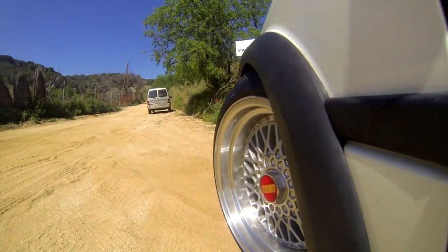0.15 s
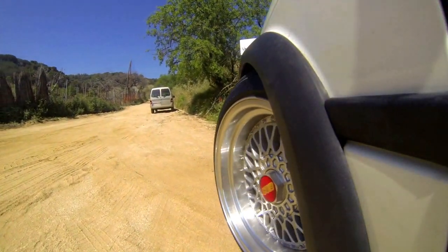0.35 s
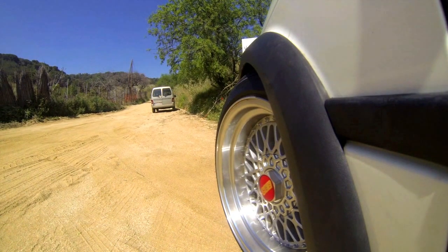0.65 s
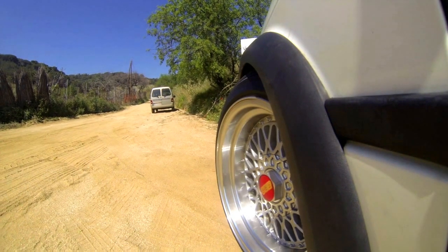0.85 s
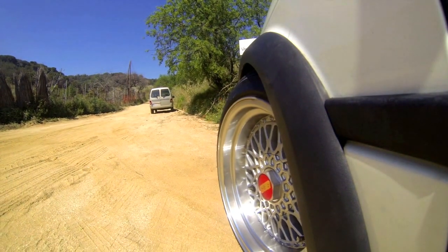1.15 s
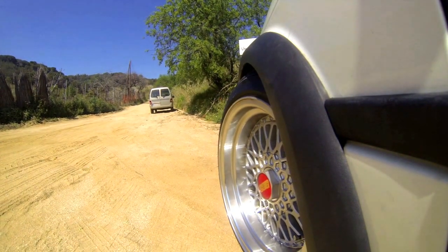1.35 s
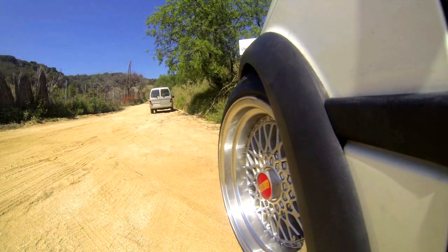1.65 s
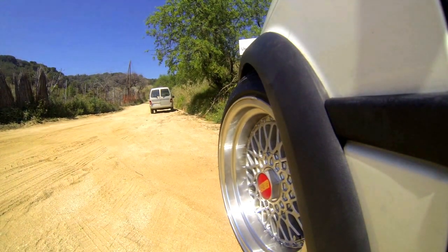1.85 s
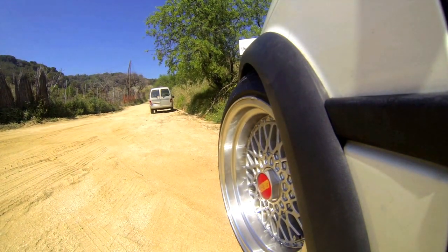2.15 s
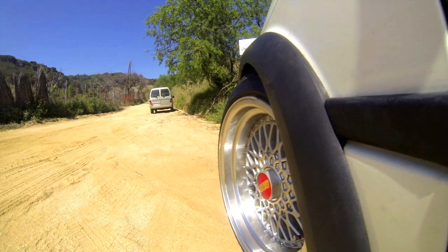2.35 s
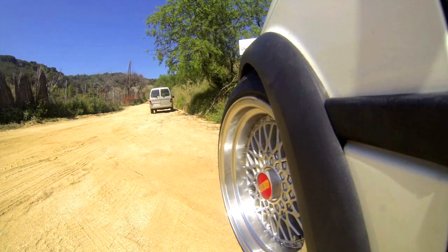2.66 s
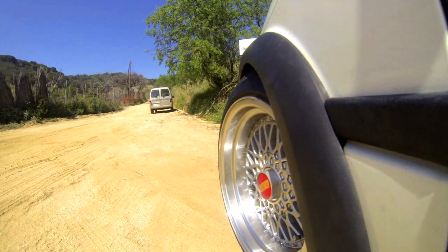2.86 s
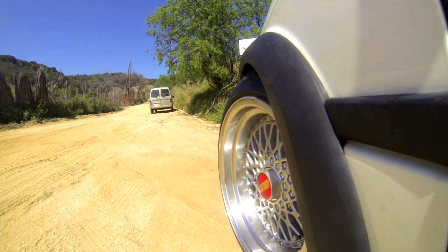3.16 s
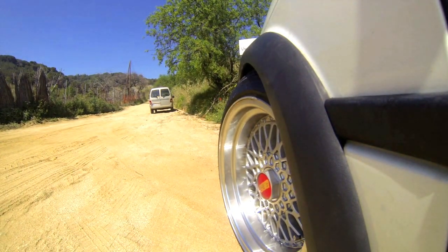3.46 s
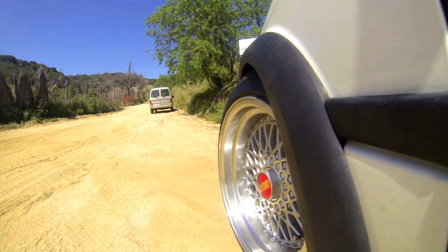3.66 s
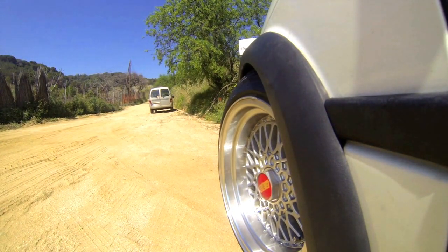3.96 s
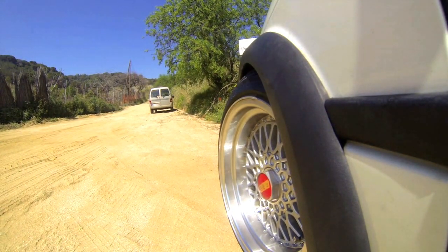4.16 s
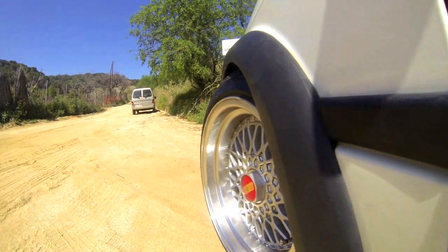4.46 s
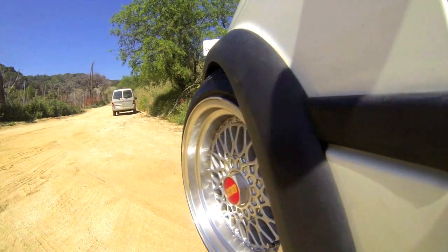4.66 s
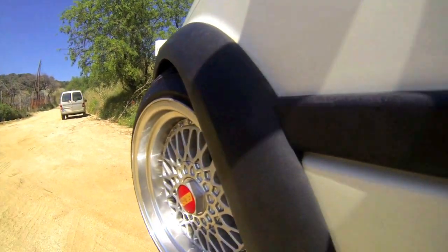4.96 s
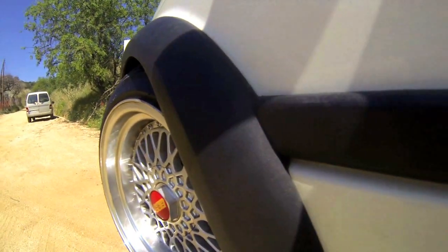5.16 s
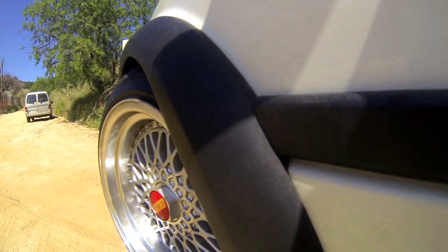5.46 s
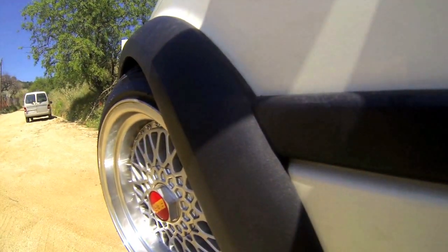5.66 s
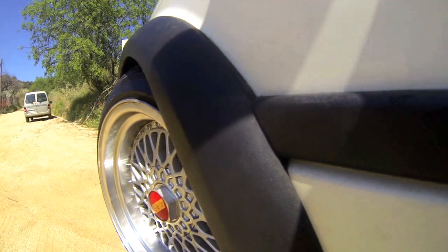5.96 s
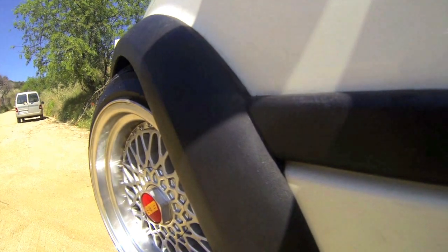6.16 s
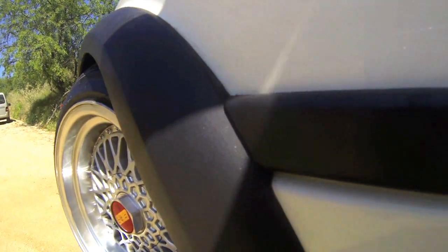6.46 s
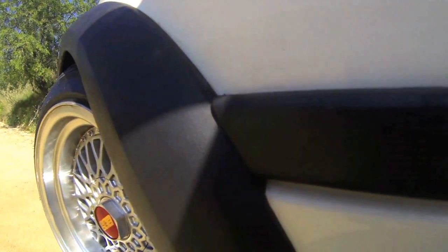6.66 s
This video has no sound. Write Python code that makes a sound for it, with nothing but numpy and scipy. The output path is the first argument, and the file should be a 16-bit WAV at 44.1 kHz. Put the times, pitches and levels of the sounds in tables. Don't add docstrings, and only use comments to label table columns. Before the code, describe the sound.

A car engine hums low and throbbing as it creeps over dirt, heard from inside a closed case on its flank. Grit hisses softly, ruts thump the door panel, and a hard bonk with rattle comes mid-way. A dense burst of knocks, plastic ticks and a tiny metallic ring follows, then smaller bumps fade into calm rolling.

```python
import sys
import numpy as np
from scipy import signal
from scipy.io import wavfile
from scipy.ndimage import uniform_filter1d

SR = 44100
rng = np.random.default_rng(int(sys.argv[2]) if len(sys.argv) > 2 else 0)


def boost(x):
    u = np.asarray(x, float) / 20
    return 10 ** u


def to_wav(s):
    ch = np.atleast_2d(s).T
    pcm = np.round(np.clip(ch, -1, 1) * 32767)
    wavfile.write(sys.argv[1], SR, pcm.astype(np.int16))


N = 300850
TIME = np.arange(N) / SR

# time in seconds, loose grit in dB, roughness in dB.
GROUND = [(0, -74.5, -63), (.35, -76.5, -52), (.76, -75.5, -59), (1.01, -69.5, -52.5), (1.18, -61, -56),
          (1.46, -57, -50.5), (2.41, -70, -54), (2.7, -71, -55.5), (3.45, -73.5, -55.5), (3.71, -71, -40),
          (4.05, -78, -48), (4.27, -70, -49.5), (4.4, -55.5, -44), (4.54, -71.5, -41.5), (4.74, -69, -48),
          (5.41, -76, -54.5), (6.3, -73.5, -62), (6.7, -76, -61)]


def evened(x):
    return x / np.sqrt(np.mean(x ** 2) + 1e-20)


def curves(rows):
    s, *columns = np.transpose(rows)
    return [np.interp(TIME, s, column) for column in columns]


def add(mix, s, sound):
    part = mix[round(s * SR):][:len(sound)]
    part += sound[:len(part)]


def wander(per_s):
    hz, phase = np.geomspace(per_s / 10, per_s, num=16), rng.random(16)
    coarse = TIME[::256]
    sines = np.sin(2 * np.pi * (hz * coarse[:, None] + phase))
    return evened(np.interp(TIME, coarse, sines @ hz ** -.5))


def ring(x, modes):
    out = np.zeros(len(x))
    for k, (hz, width, db) in enumerate(modes):
        pole = np.exp((2j * np.pi * hz - np.pi * abs(width)) / SR)
        answer = signal.lfilter([1], [1, -pole], x).imag
        out += (-1) ** k * boost(db) * np.sqrt(1 - abs(pole)) * answer
    return out


def noise(spectrum, patchy_db, size):
    hz = np.fft.rfftfreq(size, 1 / SR)
    a, b, patches = rng.standard_normal((4 * N // size + 5, len(hz), 3)).T
    patches = uniform_filter1d(patches, size=8, axis=0)
    patches = evened(uniform_filter1d(patches, size=8, axis=1))
    f, db = np.transpose(spectrum)
    shape_db = np.interp(np.log(hz + 1), np.log(f + 1), db, left=-120, right=-120)
    z = (a + 1j * b) * boost(shape_db[:, None] + patchy_db * patches)
    return evened(signal.istft(z, nperseg=size, noverlap=3 * size // 4)[1][:N])


def engine():
    # time in seconds, firing rate in Hz, level of the firing order in dB.
    idle = [(0, 24.1, -43), (.15, 24.8, -43), (.3, 27.5, -54), (.45, 35.4, -36), (.75, 34.3, -41),
            (.9, 30.8, -42), (1.11, 28.1, -44), (1.52, 27.9, -43), (2.25, 27, -46), (2.46, 27.8, -46),
            (2.99, 27.8, -43), (3.55, 27.7, -48), (3.85, 28.4, -41), (4.25, 28.3, -40), (5.13, 26.5, -42),
            (5.55, 27.5, -41), (6.03, 27.8, -40.5), (6.3, 27.1, -44)]
    # time in seconds, change in dB, half length in seconds.
    rocks = [(0.086, -4, 0.028), (0.205, -0.5, 0.046), (0.605, -4, 0.059), (1.277, -11, .07),
             (1.434, -14.5, 0.096), (1.8, -6.5, 0.057), (2.135, -16, 0.07), (2.24, -22, 0.065),
             (3.12, -7.5, .12), (3.366, -16, 0.065), (3.7, -15, 0.07), (3.885, -12, .1), (4.328, 13, 0.079),
             (4.527, -17.5, 0.089), (4.714, -13, 0.058), (4.92, -2.5, 0.072), (5.16, -17, 0.11),
             (5.672, -4, 0.12), (6.493, -10, 0.15)]
    # order as a multiple, level in dB against order 3.
    uneven = [(2.5, -17), (3.5, -10.5), (4, -15.5)]
    average_rough_db, drift_db = -51, 2.3

    hz, first_db = curves(idle)
    for s, db, half in rocks:
        first_db = first_db + db * np.maximum(1 - abs(TIME - s) / half, 0)
    turn = 2 * np.pi * np.cumsum(hz) / SR
    rough_db = curves(GROUND)[1] - average_rough_db
    second_db = -55 + 0.46 * rough_db + drift_db * wander(per_s=2)
    second_db += -5.5 * np.clip(2 * (TIME - 5.5), 0, 1)
    third_db = -58 + 0.11 * rough_db + drift_db * wander(per_s=2)
    orders = [(1, first_db), (2, second_db), (3, third_db)]
    orders += [(round(2 * k) / 2, third_db + db) for k, db in uneven]
    return sum(np.sqrt(2) * boost(db) * np.sin(k * turn) for k, db in orders)


def road():
    # frequency in Hz, density in dB per Hz.
    cavity = [(410, -41.5), (700, -14.5), (920, -12), (1040, -13), (1180, 1), (1400, 2), (1600, -5),
              (1830, -32.5), (2150, -12.5), (2350, -32), (3050, -35), (3600, -32.5), (4500, -45),
              (7000, -64.5)]
    # pitch in Hz, width in Hz, level in dB.
    panel = [(99.3, 12, 1), (108, 12, -4), (212.8, 34, -14), (138.2, 13, -13)]
    # frequency in Hz, density in dB per Hz.
    structure = [(10, -26.5), (18, -3.5), (35, -14), (50, -16.5), (75, -10.5), (103, -16), (145, -29),
                 (180, -40), (244, -34), (302, -29.5), (402, -36), (600, -37.5), (1000, -48.5), (1300, -84)]

    cavity_db, panel_db = curves(GROUND)
    stirred = boost(-63.5) + boost(cavity_db - 7) + boost(panel_db - 18)
    clumps = evened(uniform_filter1d(rng.standard_normal(N), size=500))
    hiss = noise(cavity, patchy_db=1.5, size=512) * boost(0.26 * clumps)
    gusts = evened(uniform_filter1d(rng.standard_normal(N), size=1500))
    jolts = rng.standard_normal(N) * boost(4.24 * gusts)
    shake = evened(ring(jolts, panel))
    rumble = noise(structure, patchy_db=1.6, size=4096)
    return boost(cavity_db + 1.0) * hiss + boost(panel_db - 0.8) * shake + boost(3) * stirred * rumble


def camera():
    # phase of the cycle from 0 to 1, whine pitch in Hz, level in dB.
    readout = [(0, 14955, -83), (.17, 14955, -83), (.21, 14890, -93), (.25, 14945, -82), (.4, 14850, -80.5),
               (.47, 14845, -81), (.51, 14840, -104), (.91, 14930, -104), (.96, 14950, -84)]
    # frequency in Hz, density in dB per Hz.
    preamp = [(900, -20.5), (1800, 0.5), (2500, -4), (3200, -7), (5000, -11), (8000, -16.5), (12500, -20.5),
              (13800, -29.5), (15300, -36.5)]
    readout_per_s = 15 / 1.001

    phase, hz, db = np.transpose(readout)
    cycle = TIME * readout_per_s % 1
    wobble_hz = 65 * evened(uniform_filter1d(rng.standard_normal(N), size=600))
    turn = 2 * np.pi * np.cumsum(np.interp(cycle, phase, hz, period=1) + wobble_hz) / SR
    gate = boost(np.interp(cycle, phase, db, period=1))
    whine = gate * (np.sin(turn) + boost(-9.5) * np.sin(turn / 2))
    return whine + boost(-80.5) * noise(preamp, patchy_db=-1.35, size=512)


def panel_swings(events):
    out, t = np.zeros(N), np.arange(SR // 2) / SR
    rise_turns = 1.5
    for (s, db, hz, t60), phase in zip(events, rng.random((len(events), 2))):
        partner = np.sin(2 * np.pi * (1.17 * hz * t + phase[0]))
        swing = np.sin(2 * np.pi * hz * t) + 0.17 * partner
        envelope = (1 - np.exp(-t * hz / rise_turns)) * boost(-60 * t / max(t60, .03))
        add(out, s - .004, boost(db) * swing * envelope / envelope.max())
    return out


def thumps():
    # time in seconds, peak in dB, panel pitch in Hz, ring t60 in seconds.
    ruts = [(.03, -50, 87.6, 0.2), (.6, -49, 109, .48), (.908, -50, 91.7, 0.22), (1.035, -43.5, 88, 0.29),
            (1.278, -33.5, 95.5, 0.14), (1.54, -48, 125, 0.13), (1.682, -44.5, 117, 0.16),
            (1.822, -36, 99, 0.21), (1.85, -31, 102.3, .16), (1.952, -36.5, 92.7, 0.19),
            (2.175, -43.5, 104.6, 0.22), (2.29, -45.5, 108, 0.67), (2.5, -45, 101.4, 0.21),
            (3.06, -48, 96, 0.26), (3.188, -35, 89, 0.16), (3.256, -37.5, 95.1, 0.47),
            (3.554, -29.5, 140, .16), (3.573, -28.5, 94.9, 0.22), (3.601, -42, 81.2, 0.17),
            (3.736, -38, 93.7, .22), (4.047, -43, 85, 0.46), (4.278, -23.5, 84, 0.18),
            (4.287, -22, 108, 0.1), (4.378, -31.5, 90.6, 0.2), (4.659, -33.5, 108, 0.1),
            (4.699, -32.5, 96.4, 0.16), (4.972, -33, 100, 0.16), (5.068, -33.5, 96.7, 0.14)]
    return panel_swings(ruts)


def belt():
    # start in seconds, end in seconds, pitch in Hz, level in dB.
    lines = [
        (3.2, 3, 440, -79),
        (5.42, 6.82, 330, -76.5),
        (2.8, 4.2, 357, -85),
        (4.6, 6, 380, -84),
        (.35, .8, 420, -79.5),
        (1.55, 3.3, 415, -80),
        (5.6, 6.15, 370, -86),
    ]
    out = np.zeros(N)
    for start, end, hz, db in lines:
        on = uniform_filter1d(1. * (TIME > start) * (TIME < end), size=6000)
        turn = 2 * np.pi * np.cumsum(hz * (1 + 0.01017 * wander(per_s=2))) / SR
        out += on * boost(db + 1.5 * wander(per_s=5)) * np.sqrt(2) * np.sin(turn)
    return out


def bonks():
    # time in seconds, peak in dB, pitch in Hz, ring t60 in seconds.
    upper_mode = [(1.272, -48, 197, .15), (1.461, -56, 197, .15), (1.545, -53.5, 241, 0.2),
                  (1.677, -54, 234, 0.22), (1.83, -53.5, 227, 0.36), (2.184, -57, 241, 0.27),
                  (3.028, -57.5, 188, 0.14), (3.197, -55.5, 190.3, 0.26), (3.503, -49.5, 291, 0.094),
                  (3.556, -32, 198.3, 0.25), (3.573, -26.5, 223.5, 0.14), (3.879, -48.5, 215, 0.072),
                  (4.05, -51, 190, .29), (4.28, -34, 211.6, 0.059), (4.306, -39.5, 227.8, .28),
                  (4.37, -40.5, 232.3, 0.1), (4.64, -44.5, 212, 0.15), (5.033, -39.5, 210.9, 0.29),
                  (5.073, -36.5, 214.7, 0.18), (5.311, -50.5, 345, .1), (5.312, -41, 213.4, 0.12),
                  (5.342, -42.5, 215, .1), (6.483, -61, 220, 0.33)]
    return panel_swings(upper_mode)


def blows():
    # time in seconds, peak in dB, dull modes in dB,
    # rattle t60 in seconds, favoured pitch in Hz.
    on_mount = [(1.8218, -42.5, -6, 0.1, 1320), (3.5073, -43.5, -2, 0.068, 1400),
                (3.5536, -31.5, 2, 0.11, 1230), (3.5796, -50, 1, 0.25, 1290),
                (3.6192, -51.5, -2, 0.12, 1250), (4.3887, -39, -5, .059, 1220),
                (4.4244, -36.5, 1.5, 0.057, 1410), (4.4495, -37.5, -7.5, 0.093, 1160),
                (4.5135, -35.5, -3.5, 0.088, 1750), (4.707, -46, -12, 0.061, 1320),
                (4.7441, -51, -30, .076, 1390), (4.966, -54.5, -2, 0.17, 1580),
                (5.0308, -47.5, 6.5, 0.11, 1454), (5.2268, -55.5, -24, 0.089, 1430),
                (5.308, -43.5, -4, 0.058, 1430), (5.471, -49.5, -24, 0.082, 1320)]
    # time in seconds, peak in dB, bright modes in dB,
    # rattle t60 in seconds, favoured pitch in Hz.
    on_lid = [
        (1.8387, -50.5, -23.5, 0.15, 1090),
        (2.5825, -51.5, -26, 0.071, 1285),
        (4.2446, -33, -28, .14, 1017),
        (4.2568, -37, -25, 0.05, 1320),
        (4.2793, -29.5, -27, 0.1, 1340),
        (4.3296, -38.5, -33, 0.1, 1620),
        (4.4712, -50.5, -10, 0.057, 1270),
        (4.4876, -44.5, -14, 0.13, 1580),
        (4.5015, -32.5, -17.5, 0.054, 1620),
        (5.1164, -48.5, -19.5, 0.047, 1400),
    ]
    # time in seconds, peak in dB, dull modes in dB.
    scuffs = [(1.2748, -63, 7), (3.799, -58.5, 3.5), (3.8487, -63.5, 7.5), (3.8901, -55, -8),
              (3.93, -60, -9), (4.048, -58, -9), (4.0865, -59.5, -9), (4.6259, -53, -5.5),
              (4.6594, -53.5, -3.5), (4.689, -54.5, -10), (5.0694, -53.5, -13), (5.9886, -68, 8),
              (6.4867, -68, 7.5)]
    hard_rise_s, scuff_rise_s = 0.0019, .008

    rows = [(s, db, dull_db, -39, t60, hz, hard_rise_s) for s, db, dull_db, t60, hz in on_mount]
    rows += [(s, db, -8, bright_db, t60, hz, hard_rise_s) for s, db, bright_db, t60, hz in on_lid]
    rows += [(s, db, dull_db, -32, .18, 1282, scuff_rise_s) for s, db, dull_db in scuffs]
    return sorted(rows)


def knocks():
    # pitch in Hz, width in Hz, level in dB.
    mount_modes = [(300, 40, -10), (345, 40, -9), (395, 40, -7.5), (450, 30, -3), (585, 40, -7),
                   (666, 25, -8), (714, 30, -8), (820, 50, -21), (955, 40, -19)]
    case_modes = [(1230, 150, -2), (1320, 47, -1.5), (1387, 46, -3), (1456, 180, -1), (1594, 23, -4.5),
                  (1720, 160, -8), (1996, 79, -8), (2230, 180, -13.5), (2350, 130, -19), (3740, 230, -32)]
    lid_modes = [(2400, 560, 2), (3000, 360, -10), (3300, 120, -2), (3740, 250, 2.5), (3774, 86, 2),
                 (4770, 220, -19)]
    strong_db, lid_db = -38, -27
    wall_hz = 4250

    t, out = np.arange(SR // 4) / SR, np.zeros(N)
    events = blows()
    draws = rng.standard_normal((len(events), 5, len(t)))
    for (s, db, dull_db, bright_db, t60, hz, rise), z in zip(events, draws):
        chatter = boost(3.3 * evened(uniform_filter1d(z[3], size=90)))
        blow = 1 + 0.71 * np.exp(-t / 0.0021)
        fall_db = -60 * t / max(t60, .01)
        envelope = chatter * blow * np.minimum(t / max(rise, 5e-4), 1) * boost(db)
        dull = [(f, w, m_db + 2.5 * u) for (f, w, m_db), u in zip(mount_modes, z[4])]
        hard_db = min(.8 * max(db - strong_db, bright_db - lid_db), 0)
        case = [(f, w, m_db + hard_db * (f > 1700)) for f, w, m_db in case_modes]
        case += [(hz, 110, 1.5)]
        sound = boost(dull_db + 1.5) * ring(envelope * boost(0.68 * fall_db) * z[0], dull)
        sound += boost(-4) * ring(envelope * boost(fall_db) * z[1], case)
        sound += boost(bright_db + 1.5) * ring(envelope * boost(1.3 * fall_db) * z[2], lid_modes)
        add(out, s - .003, sound)
    return signal.sosfilt(signal.butter(4, wall_hz, fs=SR, output="sos"), out)


def ticks():
    # time in seconds, peak in dB, top of the band in Hz.
    clicks = [
        (4.4875, -47, 8500),
        (5.118, -59, 4200),
        (5.3075, -56, 6000),
    ]
    out, t = np.zeros(N), np.arange(600) / SR
    for (s, db, top_hz), z in zip(clicks, rng.standard_normal((len(clicks), len(t)))):
        band = signal.butter(3, [3000, top_hz], "bandpass", fs=SR, output="sos")
        envelope = boost(db - 60 * t / 0.01) * np.minimum(t / 0.0032, 1)
        add(out, s, signal.sosfilt(band, envelope * z))
    return out


def latch():
    # time in seconds, pitch in Hz, level in dB, t60 in seconds.
    single_ring = (4.505, 2955, -65.5, .24)
    s, hz, db, t60 = single_ring
    age = np.maximum(TIME - s, 0)
    return boost(db - 60 * age / t60) * np.minimum(age / 0.0092, 1) * np.sin(2 * np.pi * hz * age)


def scene():
    car = engine() + road() + belt()
    jolted = thumps() + bonks() + knocks() + ticks() + latch()
    return (car + camera() + jolted)[None]


def roll_off(x):
    return signal.sosfilt(signal.butter(12, 15230, fs=SR, output="sos"), x)


def record(dry):
    return roll_off(dry)


dry = scene()
out = record(dry)
to_wav(out)
```